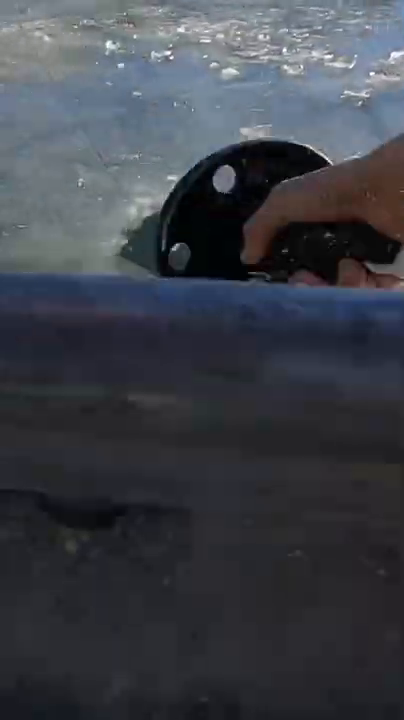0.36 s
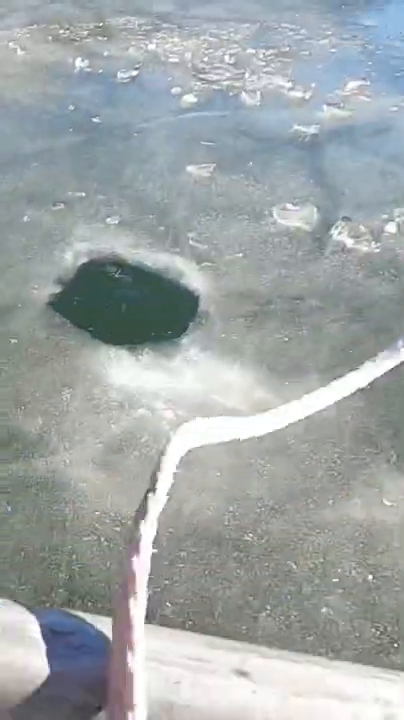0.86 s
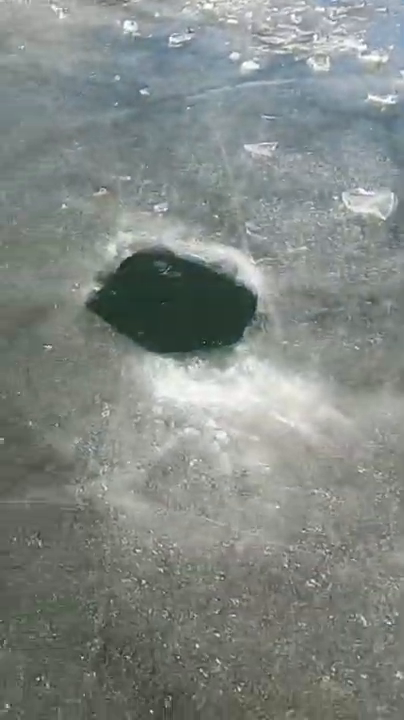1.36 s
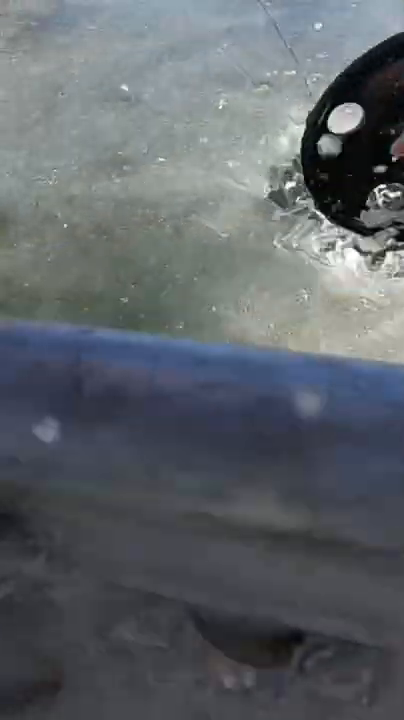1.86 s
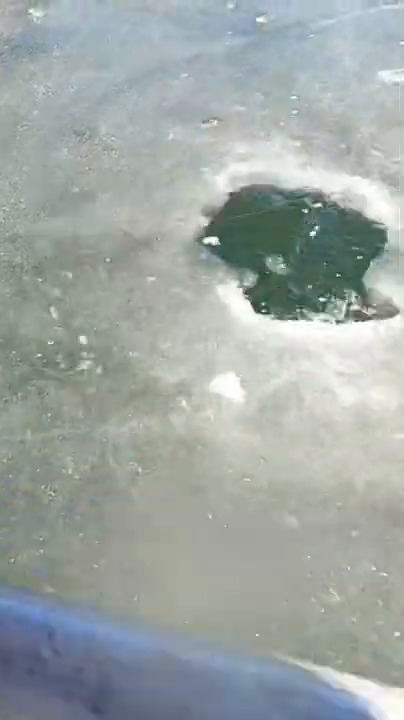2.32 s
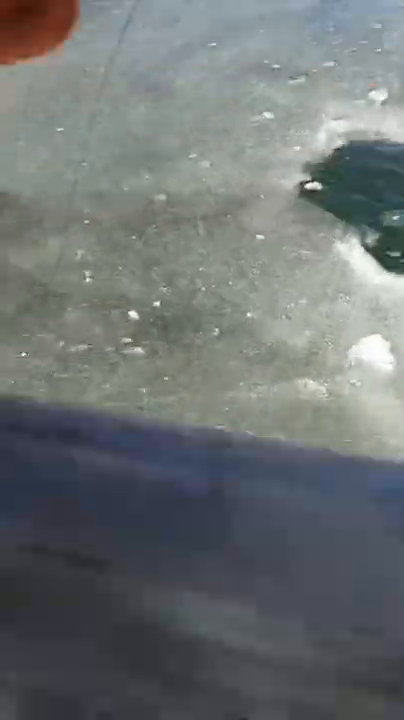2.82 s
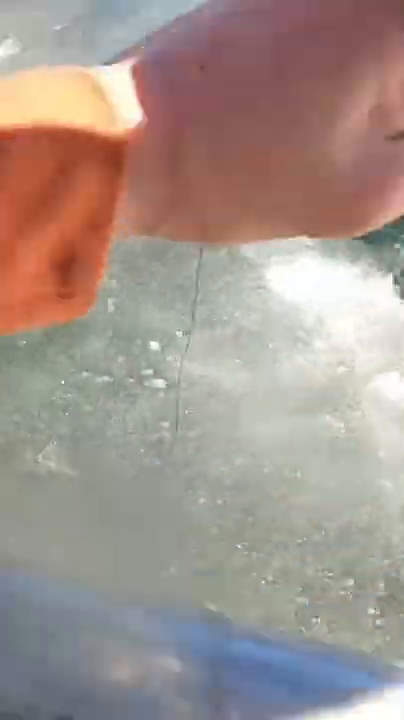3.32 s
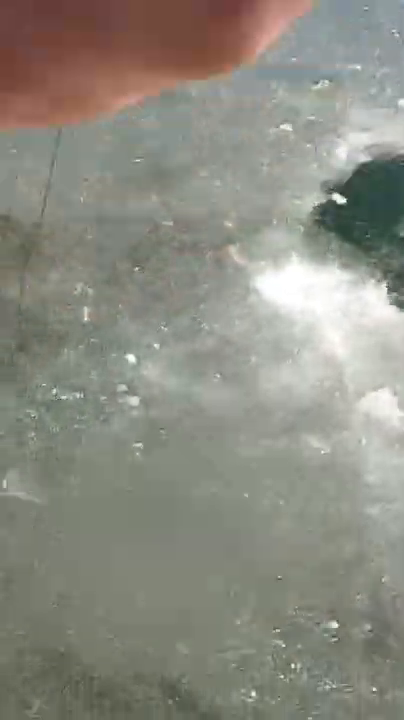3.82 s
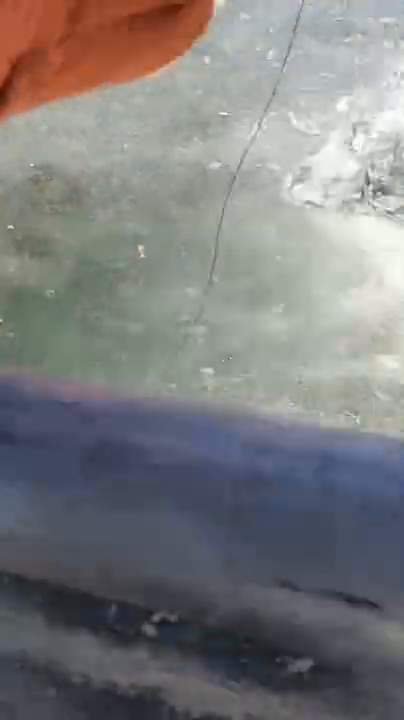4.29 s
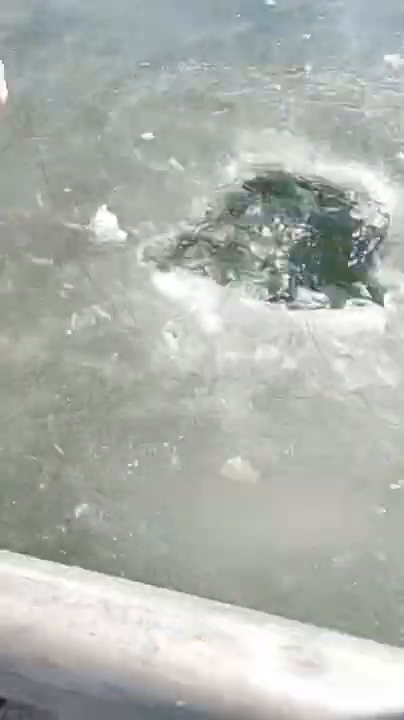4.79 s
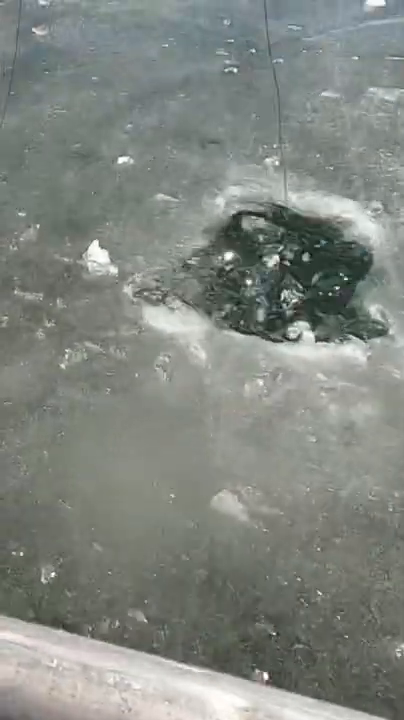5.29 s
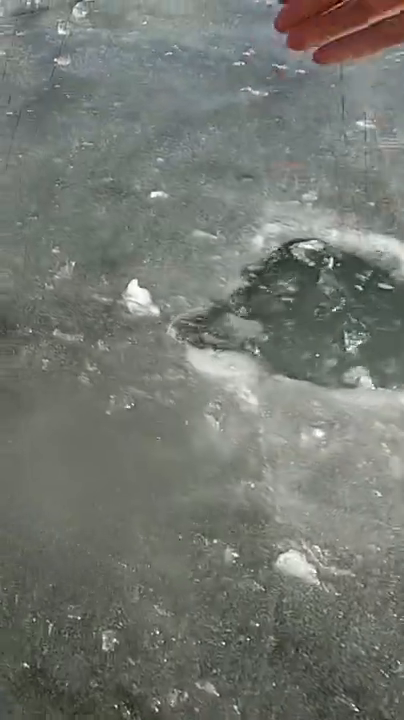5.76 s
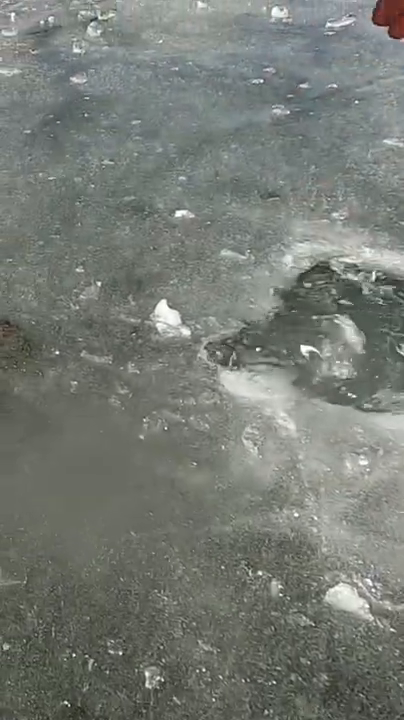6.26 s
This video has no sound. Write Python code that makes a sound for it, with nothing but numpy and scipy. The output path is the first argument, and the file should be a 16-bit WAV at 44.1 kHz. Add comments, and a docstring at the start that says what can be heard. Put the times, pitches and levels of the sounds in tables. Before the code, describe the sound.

Outdoors beside an ice hole, sharp cracking smacks burst into spray and gurgles, a metal boat thuds and clinks, then everything settles to faint wind.

```python
"""Outdoors at a hole in thin ice, heard from a microphone worn on the chest in a metal boat.
Hard blows crack the ice edge and slap the water: rattles ring sharp modes, noise bursts splinter, sines slap.
The hull thuds in beating low tones, a loose metal part rings, and trapped air bubbles as gliding sines.
Spray, sloshing, rustling clothes, wind and a far wash are grainy coloured noise; drops ring at random.
Faint squeaks glide, and something hollow drags along the hull."""
import sys
import numpy as np
from scipy import signal
from scipy.io import wavfile

SR = 44100
rng = np.random.default_rng(int(sys.argv[2]) if len(sys.argv) > 2 else 0)


def store_pcm(level_fs):
    """Save levels as 16-bit WAV."""
    pcm = np.round(np.clip(level_fs, -1, 1) * 32767).astype(np.int16)
    wavfile.write(sys.argv[1], SR, np.atleast_2d(pcm).T)


def voltage_ratio(decibels):
    """Convert decibels (scalar or array-like) to amplitude ratios, 20 dB per decade."""
    exponent = np.asarray(decibels, float) / 20
    return 10 ** exponent


N = 292383  # length in samples


def rms_one(x):
    """Scale to an average strength (rms) of 1."""
    return x / np.sqrt(np.mean(x ** 2) + 1e-20)


def in_time(rows):
    """Join the points of a (time [s], level [dB]) table by straight lines, one value a sample."""
    s, level_db = np.transpose(rows)
    return np.interp(np.arange(N) / SR, s, level_db)


def drift(rate_hz):
    """Slow random wandering with rms 1: noise at every 20th sample, smoothed twice."""
    r = np.exp(-40 * np.pi * rate_hz / SR)
    noise = rng.standard_normal(N // 20 + 2002)
    slow = signal.lfilter([1], [1, -2 * r, r * r], noise)[2000:]  # skip the filter's start
    return np.interp(np.arange(N) / 20, np.arange(len(slow)), rms_one(slow))


def ring(x, hz, t60):
    """A resonance: a unit click sets a sine ringing that falls by 60 dB in t60 seconds."""
    r, w = voltage_ratio(-60 / (t60 * SR)), 2 * np.pi * hz / SR
    return signal.lfilter([0, np.sin(w)], [1, -2 * r * np.cos(w), r * r], x + 1e-18)


def add(out, s, sound):
    """Mix a short sound in at time s."""
    i = round(s * SR)
    out[i:i + len(sound)] += sound[:N - i]


def swells(rows):
    """Strength of surges (peak time [s], level [dB], rise [s], 60 dB fall [s]), summed as power."""
    t, power = np.arange(0, N + 64, 64) / SR, 1e-14
    for s, level_db, rise, t60 in rows:
        shape_db = np.where(t < s, 8.7 * (t - s) / rise, 60 * (s - t) / t60)
        power = power + voltage_ratio(level_db + shape_db) ** 2
    return np.interp(np.arange(N) / SR, t, np.sqrt(power))


def grainy(spectrum, per_s, spread_db, grain_db, shared_db, own_db, speed):
    """Noise and random grains in third-octave bands that swell together and flicker alone; rms 1."""
    hz, level_db = np.transpose(spectrum)
    edges = hz[0] * 2 ** np.arange(0, np.log2(hz[-1] / hz[0]) + .2, 1 / 3)
    together = shared_db * drift(speed)
    sizes = voltage_ratio(spread_db * np.minimum(rng.exponential(1, N), 5)) * rng.choice([-1, 1], N)
    grains = rms_one(sizes * (rng.random(N) < per_s * voltage_ratio(together) / SR))
    # neighbouring bands take turns between two noises that share the grains
    white = rng.standard_normal((2, N)) + voltage_ratio(grain_db) * grains
    out = 0
    for k, (low, high) in enumerate(zip(edges, np.minimum(edges[1:], .45 * SR))):
        band_pass = signal.butter(2, [low, high], "band", fs=SR, output="sos")
        band = signal.sosfilt(band_pass, white[k % 2])
        centre_db = np.interp(np.log(low * high) / 2, np.log(hz), level_db)
        out = out + band * voltage_ratio(centre_db + together + own_db * drift(speed))
    return rms_one(out)


def droplets(level_db, per_s, low_hz, high_hz, cycles):
    """Drops and small bubbles come at random; each rings at one of 12 pitches, for some cycles."""
    born = rng.random(N) < per_s / SR
    sizes = born * voltage_ratio(4.4 * np.minimum(rng.exponential(1, N), 2.8)) * rng.choice([-1, 1], N)
    pitches, dealt = np.geomspace(low_hz, high_hz, 12), rng.integers(0, 12, N)
    rings = [ring(sizes * (dealt == k), hz, cycles / hz) for k, hz in enumerate(pitches)]
    return voltage_ratio(level_db) * sum(rings)


# hard blows on the ice edge: (time [s], level of modes under 2 kHz [dB], 2-3 kHz [dB], 3-4.6 kHz [dB],
# 4.6-6 kHz [dB], above [dB], smear-ahead time constant [s], pitch factor)
BLOW_HITS = [(.342, -19, -15.5, -27, -29, -22, 0.006, 0.92),
             (1.689, -20, -17.5, -20, -27, -24.5, 0.0037, 1.02),
             (2.987, -26.5, -11, -22, -25.5, -28, 0.0084, 0.985),
             (4.073, -27, -12.5, -31, -30, -25, 0.0066, 1.015)]
# what a hard blow rings with: (pitch [Hz], level [dB], time to fall 60 dB [s])
BLOW_MODES = [(800, 6, .03), (1050, 6, 0.025), (2250, -7, .01), (2700, 0, 0.016), (3230, -4, 0.012),
              (3900, -5, .01), (4450, 0, 0.02), (4900, -4, .012), (5390, 0, 0.012), (5870, -6, .012),
              (6350, -3, 0.012), (8500, -6, 0.01), (8950, -3, 0.012)]


def blows():
    """A short rattle of contacts rings all modes; thin steady tones swell up just before the hit."""
    out, t = np.zeros(N), np.arange(SR // 5) / SR - .04
    rattle_s, ahead_db = 0.0028, -3.5
    for s, *group_db, smear_s, pitch in BLOW_HITS:
        for hz, level_db, t60 in BLOW_MODES:
            gain = voltage_ratio(group_db[np.searchsorted([2000, 3000, 4600, 6000], hz)] + level_db)
            rattle = rng.standard_normal(len(t)) * (t >= 0) * np.exp(-np.maximum(t, 0) / rattle_s)
            struck = ring(rattle, pitch * hz, t60)
            # the sharp attack is smeared ahead in time, in the modes above 2500 Hz
            smear = voltage_ratio(ahead_db) * (t < 0) * (hz > 2500) * np.exp(np.minimum(t, 0) / smear_s)
            ahead = smear * np.sin(2 * np.pi * pitch * hz * t)
            add(out, s + t[0], gain * (struck / np.abs(struck).max() + ahead))
    return out


# cracks and splats: (time [s], level [dB], strongest ring [Hz], treble against the rest [dB],
# time to fall 60 dB [s])
CRACK_BURSTS = [(0.116, -27.5, 1770, -27, 0.31), (0.1291, -20, 1160, -20, 0.14),
                (0.3424, -4, 1170, -54, 0.083), (0.363, -12.5, 3060, -3.5, 0.12),
                (0.4417, -23.5, 2750, 1.5, 0.03), (1.424, -23.5, 980, -53, 0.065),
                (1.69, -5.5, 1170, -50, 0.1), (1.759, -14, 4800, 3, 0.05), (1.7795, -18, 2200, 5, 0.05),
                (1.8085, -22, 5500, 3, 0.025), (1.8575, -31, 2600, 5, 0.046), (1.9081, -31, 4820, -1, 0.11),
                (2.1856, -26.5, 5760, -8, 0.054), (2.2717, -31, 1710, -32, 0.13),
                (2.337, -31, 1600, -2.5, 0.11), (2.38, -27, 1860, -27, 0.31), (2.5155, -25, 4500, 1, 0.075),
                (2.586, -30.5, 1860, 4.5, 0.035), (2.915, -17.5, 1500, -21, 0.18),
                (2.9298, -18.5, 1770, -7.5, 0.052), (2.936, -16.5, 2390, -6.5, 0.025),
                (2.9868, 0.5, 800, -15, 0.022), (3.024, -26, 3040, 3.5, 0.14),
                (3.1082, -9.5, 930, -15, 0.032), (3.2333, -33, 1090, -0.5, 0.056),
                (3.434, -21.5, 1460, -9.5, 0.18), (3.454, -29.5, 3960, -4, 0.1),
                (3.507, -26.5, 1400, -7, 0.047), (3.9663, -25, 1880, -10, 0.095),
                (4.036, -37, 2770, 9, 0.041), (4.0718, -6, 1020, -39, 0.09),
                (4.099, -14, 2460, -16.5, 0.16), (4.1806, -11, 1020, -3.5, 0.032),
                (4.2453, -10.5, 935, -13, 0.048), (4.37, -16.5, 990, -2, 0.07),
                (4.543, -17.5, 1420, -28, 0.04), (4.6245, -45, 2290, 19, 0.017),
                (4.6804, -26, 4050, -2, 0.019), (4.974, -23.5, 1570, -32, 0.06),
                (5.109, -31, 2700, -6, 0.16), (5.386, -36.5, 5100, -2, 0.068),
                (5.4907, -41.5, 4500, -5, 0.15), (6.013, -45, 1356, 2, 0.03),
                (6.2143, -42, 1160, -5, 0.025)]


def cracks():
    """Splintering and splats: a brief noise burst through a broad body, a ring and a bright top."""
    out, t = np.zeros(N), np.arange(SR // 5) / SR - .02
    body = signal.butter(2, [700, 4500], "band", fs=SR, output="sos")
    top = signal.butter(2, [5000, 14000], "band", fs=SR, output="sos")
    for s, level_db, hz, treble_db, t60 in CRACK_BURSTS:
        rise = np.exp(np.minimum(t, 0) / (.03 * t60))  # longer splats also build more slowly
        fall = voltage_ratio(-60 * np.maximum(t, 0) / t60)
        snap = np.exp(-np.abs(t) / 0.0005)
        burst = rng.standard_normal(len(t)) * rise * (fall + snap)
        tone = ring(burst, hz, 0.0038)
        broad = signal.sosfilt(body, burst)
        bright = signal.sosfilt(top, burst)
        low = 0.64 * tone / np.abs(tone).max() + 0.43 * broad / np.abs(broad).max()
        mixed = low + voltage_ratio(treble_db) * bright / np.abs(bright).max()
        add(out, s + 0.001018 + t[0], voltage_ratio(level_db) * mixed)
    return out


# sharp slaps and single drops: (time [s], level [dB], ring [Hz], cycles to fall 60 dB)
SLAP_HITS = [(0.1292, -21.5, 1050, 17), (0.36, -10, 2500, 10), (0.367, -11, 3100, 14.),
             (0.371, -12, 2190, 11), (0.395, -6.5, 2710, 10), (0.399, -3, 1070, 5.1),
             (0.4409, -9.5, 980, 4), (1.7455, -24, 2400, 12.), (1.7595, -15, 2800, 22.),
             (1.7675, -18, 2800, 20.), (1.7795, -25, 2000, 4.5), (1.783, -20, 3200, 11),
             (1.809, -19, 3000, 10), (1.868, -21.5, 870, 7.9), (2.187, -29.5, 2400, 33),
             (3.068, -28, 8140, 25.), (3.1402, -18, 2170, 12.5), (3.156, -29, 9000, 20.),
             (3.197, -29.5, 10100, 27), (3.3895, -31, 700, 8.7), (3.908, -22, 660, 8.),
             (4.082, -4.5, 1000, 6.9), (4.112, -14.5, 800, 8.7), (4.129, -20, 2570, 22),
             (4.131, -14, 880, 11), (4.244, -22, 3150, 33), (4.2684, -27, 3000, 25),
             (4.3207, -17, 1090, 17), (4.334, -16.5, 1000, 16.), (4.338, -27, 1330, 17),
             (4.373, -23.5, 2780, 20.)]


def slaps():
    """A single push rings one short mode; a bright tick of noise marks its start."""
    out, t = np.zeros(N), np.arange(SR // 20) / SR
    tick_db, tick_s = -12, 0.00026
    for s, level_db, hz, cycles in SLAP_HITS:
        tone = np.sin(2 * np.pi * hz * t) * voltage_ratio(-60 * t * hz / cycles)
        tick = voltage_ratio(tick_db) * rng.standard_normal(len(t)) * np.exp(-t / tick_s)
        add(out, s, voltage_ratio(level_db) * (tone + tick))
    return out


# dull thuds through hull and water: (time [s], level before a common cut [dB], pitch [Hz],
# time to fall 60 dB [s])
THUD_HITS = [(.003, -15, 140, 0.043), (0.024, -11, 166, 0.09), (0.065, -16.5, 151, 0.079),
             (0.087, -12.5, 174, 0.062), (0.24, -13, 221, 0.19), (0.3479, 3, 314, 0.058),
             (0.36, -10, 118, 0.26), (.41, -19, 125.9, 0.97), (1.519, -39, 142, 0.46),
             (1.592, -12.5, 137, 0.14), (1.696, 1.5, 205, 0.059), (2.092, -15, 236, 0.065),
             (2.684, -20, 198, 0.23), (2.773, -15.5, 182, 0.077), (2.936, -8.5, 328, 0.02),
             (2.957, -11.5, 288, 0.041), (2.991, -5, 206, 0.062), (2.9924, -7.5, 341, 0.057),
             (3.111, -11, 256, 0.013), (3.348, -14.5, 324, 0.019), (3.393, 0.5, 216, 0.011),
             (3.651, -23, 337.3, 0.25), (3.851, -16.5, 175, 0.13), (3.877, -9.5, 204.5, 0.19),
             (3.975, -10, 170, 0.041), (3.914, -3, 155, 0.053), (4.02, -10, 223, 0.091),
             (4.075, -6, 379, 0.12), (4.114, 2.5, 191, 0.0063), (4.24, -16.5, 377, 0.16),
             (4.324, -14.5, 394, 0.15), (4.53, -11, 338, 0.038), (4.703, -23, 246.4, 0.15),
             (4.905, -20, 390, 0.096), (4.977, -17, 237, 0.16), (5.08, -19, 263, 0.048),
             (5.112, -6.5, 283, 0.1), (5.134, -37, 300, 0.05), (5.243, -32, 406, .05),
             (5.956, -39, 129.4, 0.45), (6.1, -36.5, 395, 0.27), (6.14, -34, 290.7, 0.34)]


def thuds():
    """A soft push rings two close low modes and a weaker overtone, which beat as they die."""
    out, t = np.zeros(N), np.arange(SR // 3) / SR
    for s, level_db, hz, t60 in THUD_HITS:
        detune, turn = rng.random(2)
        phase = 2 * np.pi * hz * t
        pair = np.sin(phase) + 0.35 * np.sin(phase * (1.15 + 0.0095 * detune))
        overtone = 0.24 * np.sin(1.9 * phase + 6 * turn)
        swell = (1 - np.exp(-t / 0.00086)) * voltage_ratio(-60 * t / t60)
        add(out, s, voltage_ratio(level_db - 4.5) * (pair + overtone) * swell)
    return out


def stirred_water():
    """Every thud stirs the water: strength of the slosh around it, greater for stronger thuds."""
    return swells([(s, -17 + .85 * level_db, .004, .28) for s, level_db, *_ in THUD_HITS])


# touches on the metal part: (time [s], level [dB], extra for upper modes [dB], extra for the lower twin [dB],
# factor on the ring times, contact swell [s])
METAL_TOUCHES = [(0.431, -32, -30, -5, 1.98, 0.023), (4.073, -25, -32, 6, 0.35, 0.002),
                 (4.125, -27, -29, -2, 0.76, 0.0015), (4.221, -33.5, -21, -9, 1.2, 0.0087),
                 (5.11, -31.5, -7.5, 0, 0.74, 0.00055), (5.354, -52, -30, 7, 0.66, .01),
                 (5.388, -51.5, -30, 8.5, 1.4, 0.0024), (5.49, -46, -38, -14, 1, 0.0035)]
# how the loose metal part rings: (pitch [Hz], level [dB], time to fall 60 dB before the factor [s])
METAL_MODES = [(2420, -19, 0.08), (2815, 0, 0.27), (2874, 5.5, 0.11), (4230, 6, 0.075), (4300, 9, 0.036),
               (4420, 0, 0.19)]


def clinks():
    """Each touch rings the metal part; its hold sets the ring time, and long contacts swell in slowly."""
    out, t = np.zeros(N), np.arange(SR // 2) / SR
    for s, touch_db, upper_db, twin_db, hold, contact_s in METAL_TOUCHES:
        for k, (hz, level_db, t60) in enumerate(METAL_MODES):
            is_twin = k == 1  # the lower of two close modes, which swells half as fast
            gain = voltage_ratio(touch_db + level_db + upper_db * (hz > 3500) + twin_db * is_twin)
            swell = (1 - np.exp(-t / (contact_s * 2 ** is_twin))) * voltage_ratio(-60 * t / (hold * t60))
            add(out, s, gain * swell * np.sin(2 * np.pi * hz * t))
    return out * voltage_ratio(1.2 * drift(45))  # the loose part chatters


# large air pockets: (time [s], level [dB], start pitch [Hz], end pitch [Hz], time to fall 60 dB [s])
AIR_POCKETS = [(1.995, -30, 474, 530, 0.069), (2.1, -16, 358, 407, 0.065), (2.378, -26, 288, 436, 0.078),
               (3.885, -21.5, 570, 730, 0.048), (4.098, -24, 2300, 2240, 0.063),
               (4.285, -20.5, 680, 650, 0.055), (4.532, -34, 1384, 1404, 0.1),
               (4.655, -36, 1199, 940, 0.087), (4.182, -10.5, 926, 1090, 0.04),
               (4.195, -23, 1027, 1060, 0.093), (4.247, -31, 1050, 1236, 0.33),
               (4.453, -27.5, 534, 248, 0.21), (4.454, -30, 1085, 845, 0.055),
               (4.58, -27.5, 908, 707, 0.11), (4.603, -25.5, 850, 870, 0.065), (4.41, -31, 965, 1037, .04),
               (4.492, -34, 2400, 2320, 0.076), (4.496, -25, 365, 376, 0.45), (4.66, -48, 2930, 2400, 0.08),
               (4.585, -31, 1650, 1300, 0.045), (5.194, -27, 620, 900, 0.025),
               (4.898, -22.5, 696, 900, 0.032), (5.071, -20.5, 726, 560, 0.052)]


def bubbles():
    """Trapped air rings as a sine that glides in pitch and wobbles in strength."""
    out, t = np.zeros(N), np.arange(SR // 4) / SR
    wobble = 1 + 0.25 * np.sin(2 * np.pi * 45 * t)
    for s, level_db, start_hz, end_hz, t60 in AIR_POCKETS:
        pitch = end_hz + (start_hz - end_hz) * np.exp(-6.0 * t / t60)
        swell = (1 - np.exp(-t / 0.0031)) * voltage_ratio(-60 * t / t60) * wobble
        add(out, s, voltage_ratio(level_db) * swell * np.sin(2 * np.pi * np.cumsum(pitch) / SR))
    return out


# colour of the spray: (frequency [Hz], level per Hz [dB])
SPRAY_COLOUR = [(1500, -52), (2300, 5.5), (3000, -1), (4400, 1.5), (6000, -1), (7200, -10.5), (8500, -3.5),
                (10000, -9.5), (12500, -1), (15500, -14)]


def spray(splash, swing_db):
    """Hissing grains and ringing drops grow louder with the splashes and with body movement."""
    patter = voltage_ratio(-58.5 + .67 * swing_db)
    hiss = grainy(SPRAY_COLOUR, per_s=300, spread_db=5.0, grain_db=-9.0, shared_db=1.6, own_db=1.6, speed=25)
    drops = droplets(4.4, per_s=130, low_hz=1455, high_hz=12000, cycles=28.0)
    return np.hypot(patter, splash) * (hiss + drops)


# water thrown up: (peak time [s], level [dB], rise time constant [s], time to fall 60 dB [s])
SPLASH_SURGES = [(.2, -50, 0.19, 0.65), (.39, -35.5, 0.067, 0.41), (1.772, -32.5, 0.045, 0.4),
                 (3.0, -42, 0.025, 0.79), (4.2, -40.5, 0.12, 0.95), (4.55, -45.5, 0.1, 1)]


def splash_strength():
    """Each splash surges up and dies away; this strength drives its spray, body and gurgle."""
    return swells(SPLASH_SURGES)


def gurgle(splash, middle):
    """Small bubbles ring at random at steady rates, loudest in the splashes."""
    steady = middle * droplets(-8.0, per_s=120, low_hz=450, high_hz=2800, cycles=30.0)
    return steady + splash * droplets(4.4, per_s=260, low_hz=400, high_hz=3250, cycles=22.0)


# colour of the sloshing: (frequency [Hz], level per Hz [dB])
SLOSH_COLOUR = [(70, -31), (110, -4.5), (225, -2), (360, -7.5), (480, -12), (700, -19.5), (1100, -36)]


def slosh(swing_db):
    """Low, lumpy water noise follows body movement and the stirring of the thuds."""
    strength = np.hypot(voltage_ratio(-41 + .42 * swing_db), stirred_water())
    return strength * grainy(SLOSH_COLOUR, per_s=80, spread_db=2.0, grain_db=-6.0,
                             shared_db=2.2, own_db=2.5, speed=14)


# wind on the microphone: (time [s], level [dB])
WIND_GUSTS = [(0.0, -14), (0.31, -36), (0.35, -17.5), (0.57, -34.5), (1.0, -30), (1.07, -22), (1.24, -35.5),
              (1.4, -40.5), (1.44, -17.5), (1.55, -27), (1.7, -26.5), (1.75, -25), (1.92, -21.5),
              (2.44, -38.5), (2.55, -23), (3.29, -31), (3.42, -32), (3.75, -32.5), (3.99, -16.5),
              (4.17, -31), (4.56, -31.5), (4.84, -48), (4.87, -30), (5.26, -42.5), (5.45, -38.5),
              (5.67, -42.5), (5.76, -36), (5.92, -32), (5.97, -24), (6.05, -38), (6.33, -32.5),
              (6.37, -44.5), (6.63, -36.5)]
# colour of the wind: (frequency [Hz], level per Hz [dB])
WIND_COLOUR = [(16, -29), (25, 6), (40, 0), (65, 1.5), (110, -5.5), (180, -14.5), (300, -28), (500, -64.5)]


def wind():
    """Wind buffets the microphone as low, uneven noise that rises and falls with the gusts."""
    return voltage_ratio(in_time(WIND_GUSTS)) * grainy(WIND_COLOUR, per_s=43, spread_db=0.85, grain_db=-5.0,
                                             shared_db=2.04, own_db=2.23, speed=4.6)


# body movement, as rustle: (time [s], level [dB])
BODY_MOVEMENT = [(0, -46), (.11, -55.5), (.2, -34.5), (.33, -43), (.5, -53), (.63, -57), (.79, -49.5),
                 (1.17, -48.5), (1.22, -40), (1.38, -56), (1.45, -51.5), (1.6, -37), (1.85, -45.5),
                 (1.95, -58), (2.08, -46.5), (2.6, -46.5), (2.75, -54.5), (2.9, -39), (3.16, -48),
                 (3.28, -60.5), (3.36, -46), (3.55, -48.5), (3.66, -41.5), (3.8, -58.5), (4.0, -41.5),
                 (4.3, -39.5), (4.45, -46.5), (4.54, -38), (4.82, -49.5), (4.97, -46), (5.3, -59.5),
                 (5.9, -65.5), (6.2, -67), (6.3, -75.5), (6.63, -71)]


def movement_db():
    """How strongly the body moves from moment to moment."""
    return in_time(BODY_MOVEMENT)


# colour of the rustle and of the middle of a splash: (frequency [Hz], level per Hz [dB])
RUSTLE_COLOUR = [(350, -16), (550, 12.5), (800, 7.5), (1200, 3), (1800, 3.5), (2300, 2), (4000, -6),
                 (6000, -34.5)]


def rustle(middle):
    """Rubbing cloth is grainy noise; the same colour serves as the body of the splashes."""
    return middle * grainy(RUSTLE_COLOUR, per_s=300, spread_db=4.5, grain_db=-7.0,
                           shared_db=1.8, own_db=2.0, speed=18)


# hollow thing on the hull: (time [s], length [s], level [dB])
DRAG_STROKES = [(2.335, .125, -44), (3.625, .115, -43)]
# its resonances: (pitch [Hz], level [dB], time to fall 60 dB [s])
HOLLOW_MODES = [(368, -4, 0.037), (770, -1.5, 0.016), (1740, 2.5, 0.0082)]


def drags():
    """Dense uneven slips, swelling and fading over the stroke, ring the hollow body."""
    slips = np.zeros(N)
    for s, length, level_db in DRAG_STROKES:
        size = round(length * SR)
        grit = (rng.random(size) < 2500 / SR) * rng.standard_normal(size)  # about 2500 slips a second
        add(slips, s, voltage_ratio(level_db) * np.hanning(size) ** .5 * grit)
    return sum(voltage_ratio(level_db) * ring(slips, hz, t60) for hz, level_db, t60 in HOLLOW_MODES)


# faint rubbing squeaks and scrapes: (time [s], length [s], start pitch [Hz], end pitch [Hz], level [dB])
SQUEAK_GLIDES = [(0, .125, 3750, 4100, -54), (.055, .065, 2650, 2520, -53), (5.68, .26, 4000, 4150, -68),
                 (5.72, .22, 4900, 4900, -68)]


def squeaks():
    """Faint gliding tones with a ragged, noisy strength."""
    out, ragged = np.zeros(N), drift(150)
    for s, length, start_hz, end_hz, level_db in SQUEAK_GLIDES:
        size = round(length * SR)
        tone = np.sin(2 * np.pi * np.cumsum(np.linspace(start_hz, end_hz, size)) / SR)
        add(out, s, voltage_ratio(level_db) * tone * np.hanning(size) ** .5)
    return out * ragged


# a far, dull wash: (time [s], level [dB])
FAR_LEVEL = [(0, -63), (5.85, -60), (6.3, -64), (6.45, -60), (6.63, -58)]
# its colour: (frequency [Hz], level per Hz [dB])
FAR_WASH_COLOUR = [(600, -29.5), (950, -37), (1100, 6.5), (1350, -2), (1800, -12), (2600, -41)]


def far_wash():
    """A faint band of slowly flickering noise lies behind everything."""
    return voltage_ratio(in_time(FAR_LEVEL)) * grainy(FAR_WASH_COLOUR, per_s=250, spread_db=4.1, grain_db=1.0,
                                            shared_db=0.86, own_db=2.4, speed=4.6)


def scene():
    """Water and cloth follow movement, splashes and thuds; wind has its gusts; single events sit on top."""
    rustle_db = movement_db()
    swing_db = rustle_db - rustle_db.mean()
    splash = splash_strength()
    middle = np.hypot(voltage_ratio(rustle_db), voltage_ratio(-2.5) * splash)  # cloth and the body of the splashes
    events = blows() + cracks() + slaps() + thuds() + clinks() + bubbles()
    water = spray(splash, swing_db) + gurgle(splash, middle) + slosh(swing_db)
    background = wind() + rustle(middle) + drags() + squeaks() + far_wash()
    return (events + water + background)[None]


def low_pass(x):
    """Removes everything above the highest recorded frequency."""
    return signal.sosfilt(signal.butter(12, 15780, fs=SR, output="sos"), x)


def record(dry):
    """The covered microphone dulls the treble above 9380 Hz and rounds the peaks."""
    dull = signal.sosfilt(signal.butter(4, 9380, fs=SR, output="sos"), dry)
    rounded = 0.86 * np.tanh(dull / 0.94)
    return low_pass(rounded)


dry = scene()
out = record(dry)
store_pcm(out)
```